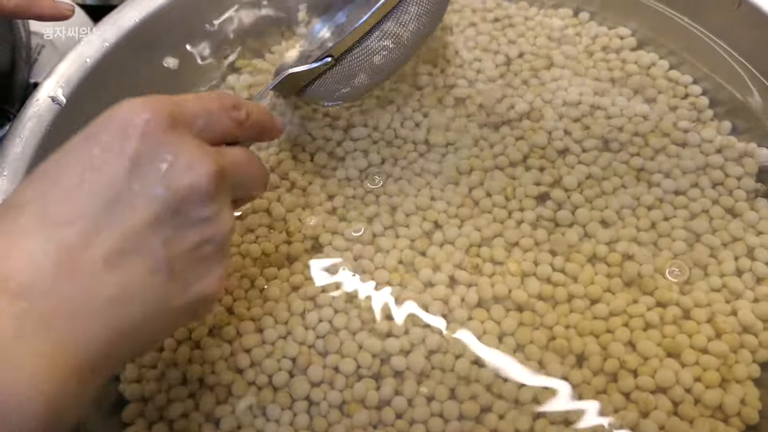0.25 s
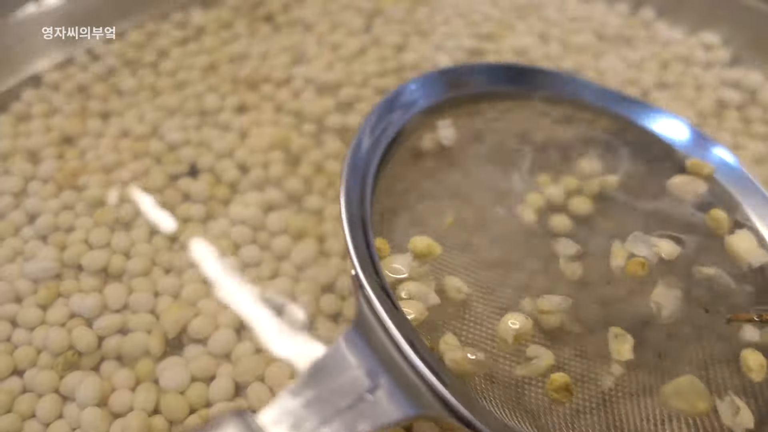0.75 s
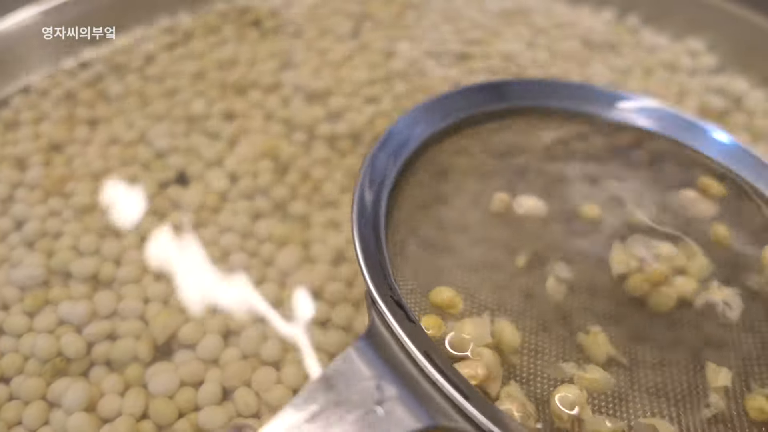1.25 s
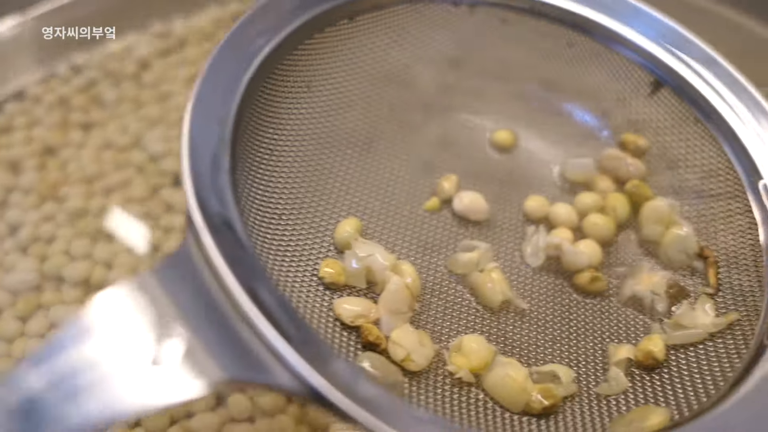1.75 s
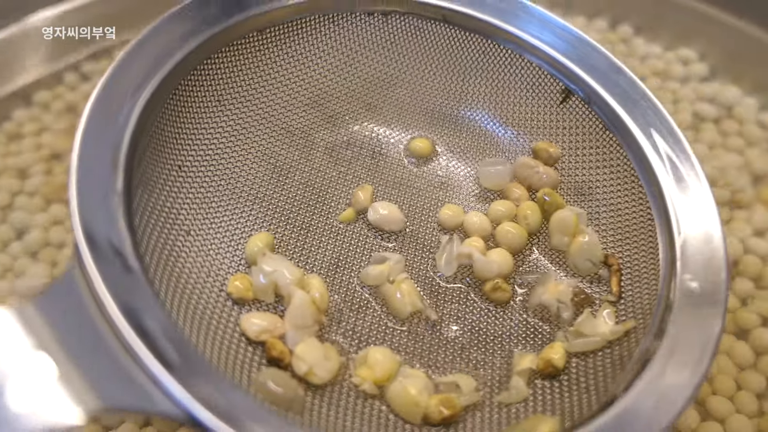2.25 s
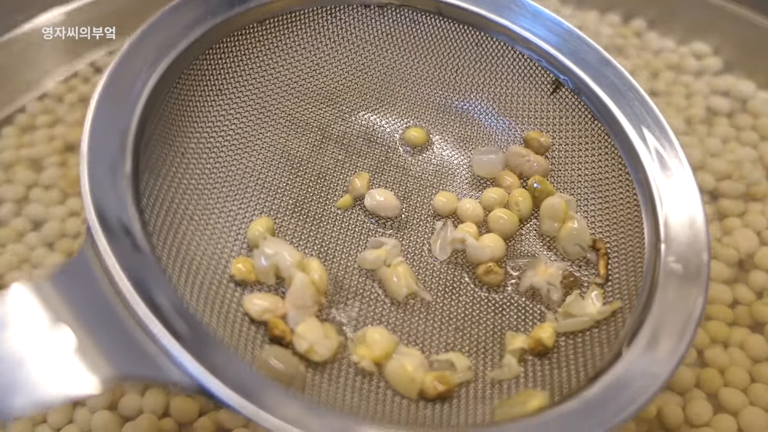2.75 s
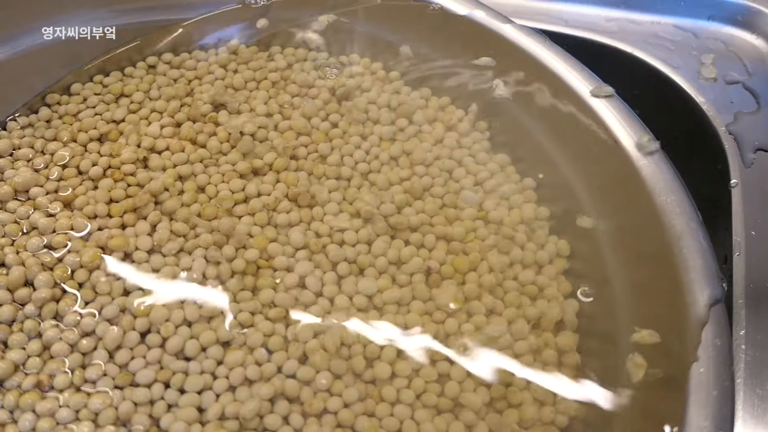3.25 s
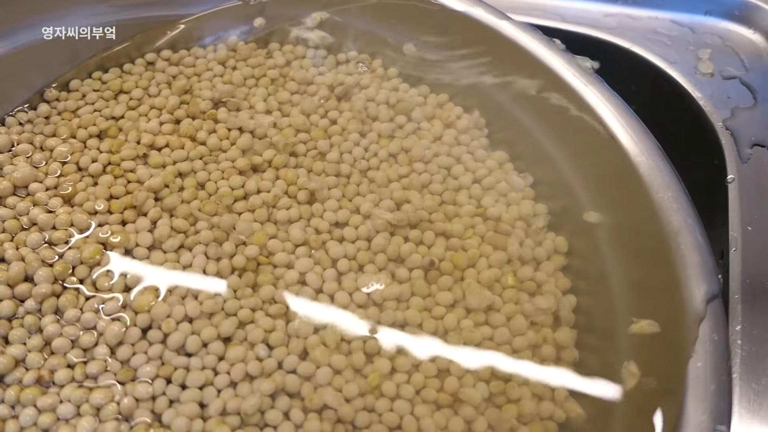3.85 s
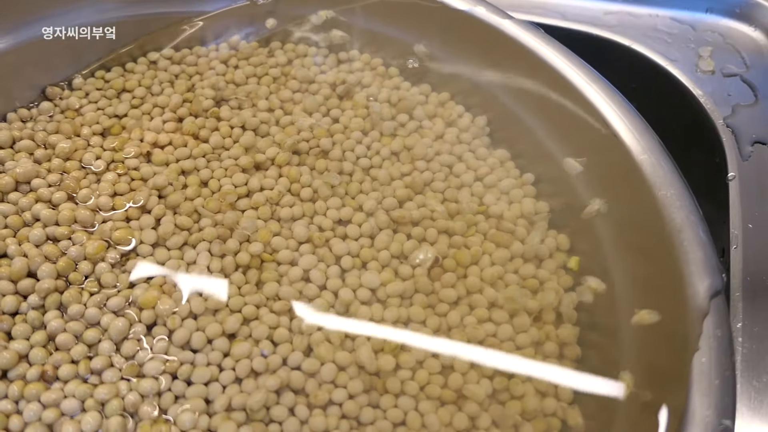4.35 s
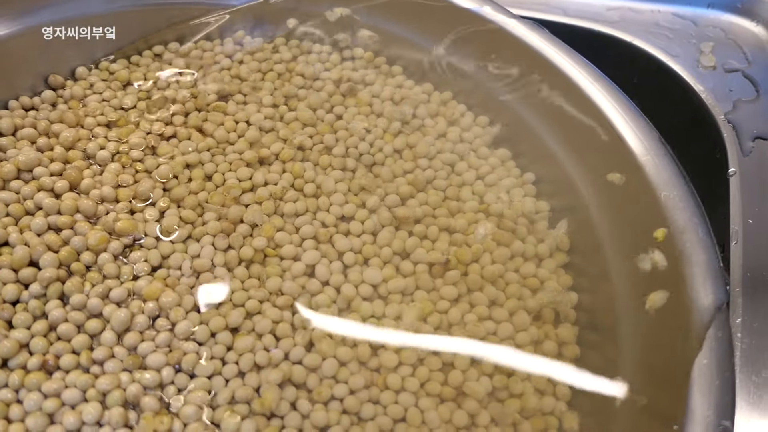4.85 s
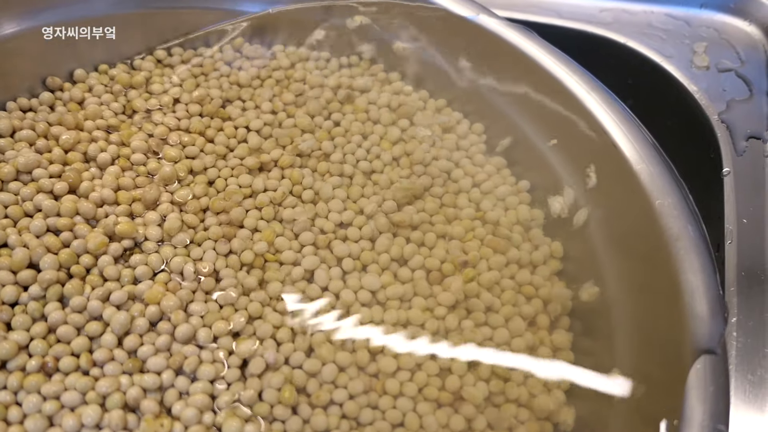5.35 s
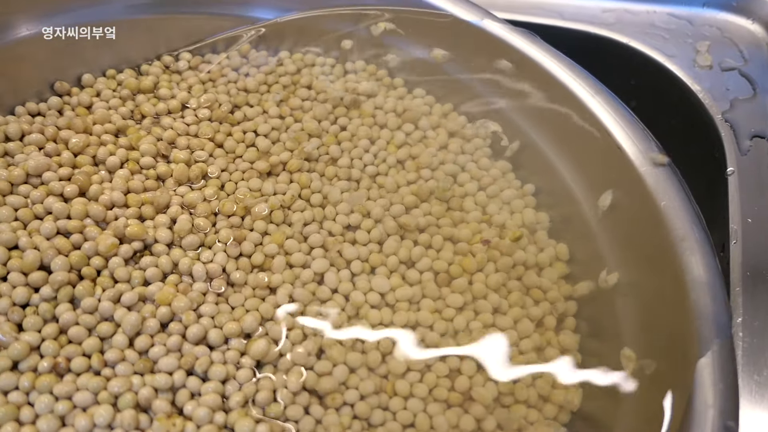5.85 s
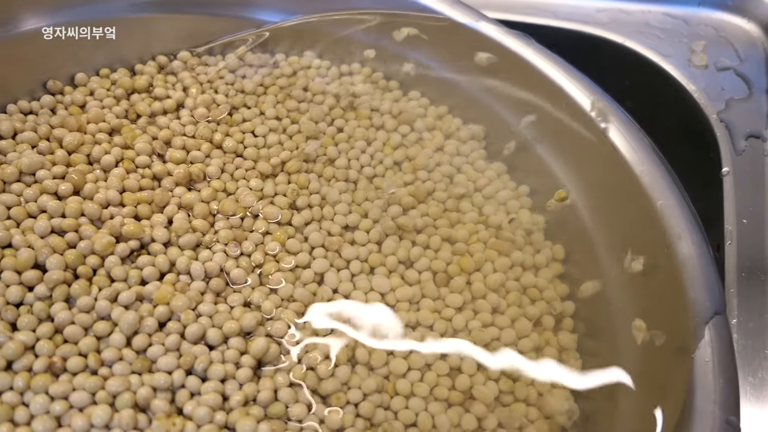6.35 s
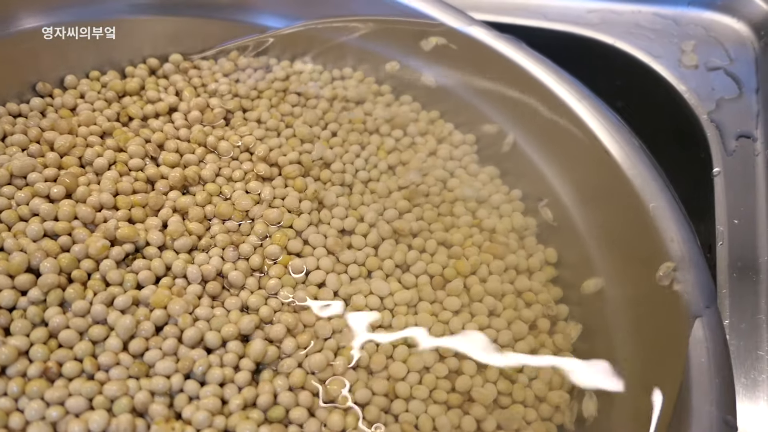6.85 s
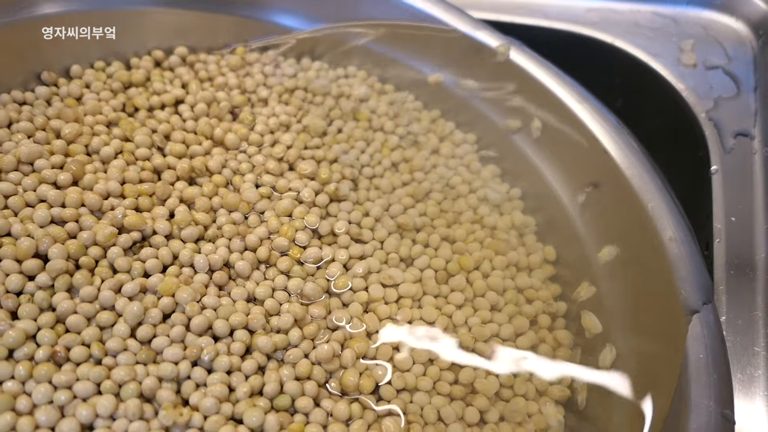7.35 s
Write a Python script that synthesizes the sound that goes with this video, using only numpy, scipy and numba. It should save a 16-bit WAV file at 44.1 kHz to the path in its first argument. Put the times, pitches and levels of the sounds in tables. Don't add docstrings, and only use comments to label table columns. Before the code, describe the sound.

In a quiet kitchen with a faint low appliance rumble, water swishes around a sieve close to the microphone. At about 0.27 seconds its rim knocks a steel bowl with a bright crack, a short metallic ring and a watery thud. The scene cuts at about 0.45 seconds to swishing, crackling water and quick clear drips falling from the mesh, thinning out by 1.9 seconds, with small wire taps. Dull bangs from another room echo at about 1.7 and, louder, 2.0 seconds. A soft handle click comes at 2.9 and a brighter one at 3.3, then brief silence. From 3.5 seconds until the end near 7.6, a tap runs abruptly and steadily into the full bowl: dense bubbling, glugs and plinks, hissing spray, sharp splashes and a drumming steel sink. Gurgling grows, and after about 6.2 seconds a faint low drain rumble joins, with soft deep gulps.

```python
import sys
import numpy as np
from scipy import signal
from scipy.fft import rfft, irfft
from scipy.io import wavfile
from scipy.ndimage import uniform_filter1d
from numba import njit

SR = 44100
rng = np.random.default_rng(int(sys.argv[2]) if len(sys.argv) > 2 else 0)


def ratio_of_db(decibels):
    return 10 ** (np.asarray(decibels, float) / 20)


def dump_mix(stems):
    frames = np.atleast_2d(stems).T
    limited = np.clip(frames, -1, 1)
    pcm = np.round(limited * 32767).astype(np.int16)
    wavfile.write(sys.argv[1], SR, pcm)


N = 335406
T = np.arange(N) / SR
HZ = np.maximum(np.arange(N // 2 + 1) * SR / N, 1.)
SIEVE_CHANGE_S, SIEVE_END_S, TAP_START_S = .452, 3.318, 3.509

# f/Hz, level/dB, t60/s
BOWL_MODES = [(241.0, 1.0, 0.1), (291.6, -3.0, 0.236), (370, -9.5, 0.31), (431, -7.5, 0.41),
              (663.5, -12.5, 0.31), (753, -21.0, 0.68), (900, -21.0, 0.26), (1116, -13, 0.19),
              (1520, -14, 0.11), (1796, -7, 0.1), (3230, -20.5, 0.11), (4650, -14.0, 0.06),
              (6250, -11.5, 0.043)]
# crest t/s, level/dB, swell/s, ebb/s, fine spray/dB
SWISHES = [(0.0, -47, .05, 0.11, -12), (.3, -46, .02, 0.23, -3), (.448, -42.5, 0.15, .1, -1.5),
           (.53, -54, 0.029, 0.11, -6), (.69, -67.5, 0.088, 0.16, -2.5), (.8, -48, 0.26, 0.18, -9),
           (.93, -54.5, 0.09, 0.12, -10), (1.22, -55, 0.21, 0.21, -23.5), (1.41, -48.5, 0.077, 0.17, -2),
           (1.54, -45.5, 0.23, 0.043, -39), (1.61, -45.5, 0.033, 0.089, -27),
           (2.38, -63.5, 0.44, 0.46, 0.5)]
# f/Hz, width/Hz, level/dB
MESH_TONES = [(2050, 330, 10.5), (3000, 1200, 18), (3840, 1400, -4)]
# t/s, peak level/dB, pitch f/Hz, snap/dB
DROPS = [(.111, -31, 8500, -21), (.149, -25, 2270, -16), (0.408, -26.5, 5930, 0), (0.417, -30, 3650, -6),
         (0.4472, -26, 4410, -9), (0.4955, -25, 3080, -16), (.5137, -30.5, 2744, -3),
         (.5484, -31, 5140, -9), (.6998, -38, 4000, 3), (.856, -49, 2060, 17.5), (0.891, -41.5, 2060, 13.5),
         (0.9571, -32.5, 1970, -9), (1.022, -38, 5470, -14), (1.1852, -41, 3120, -4),
         (1.244, -28.5, 3220, -17), (1.3065, -30.5, 7540, -2), (1.362, -31, 3880, -13),
         (1.4037, -33, 3180, -13), (1.4995, -32.5, 2330, -4), (1.587, -36, 2490, -8),
         (1.6033, -31, 3300, -1), (1.6075, -32, 4900, -3), (1.6294, -26.5, 5170, 0), (1.646, -30, 3000, -4),
         (1.676, -38, 7500, -6)]
# t/s, peak level/dB, pitch f/Hz
DRIPS = [(0.535, -39, 3090), (0.622, -48, 3070), (0.6418, -42, 3200), (0.657, -36, 3230),
         (0.7324, -37, 3310), (0.7561, -35, 1990), (0.7754, -37, 2580), (0.794, -36, 2580),
         (0.8074, -32, 3320), (0.8214, -33, 3800), (0.8459, -32, 3560), (0.9074, -39, 3080),
         (1.0609, -46, 3070), (1.1214, -45, 1870), (1.1594, -42, 3100), (1.3352, -39, 5630),
         (1.3482, -38, 3870), (1.392, -34, 3230), (1.4244, -35, 3200), (1.462, -30, 2680),
         (1.5198, -40, 2810), (1.5423, -42, 3190)]
# t/s, peak level/dB
BEADS = [
    (1.7772, -50),
    (1.7991, -45),
    (1.8144, -50),
    (1.834, -39),
    (1.862, -44),
]
# t/s, first tone f/Hz, its level/dB, second tone f/Hz, its level/dB, t60/s
WIRE_TAPS = [
    (1.631, 3340, -21.5, 1430, -26, 0.013),
    (1.915, 3000, -46, 5500, -46, .006),
    (1.961, 2320, -33, 4900, -31, 0.0029),
]
# t/s, low modes level/dB, high modes level/dB
HANDLE_CLICKS = [
    (2.9331, -32.5, -36),
    (3.2808, -25.5, -17.5),
]
# f/Hz, level/dB, t60/s
HANDLE_MODES = [(1200, -7, 0.0074), (1720, -5.5, 0.0094), (2330, 0.5, .012), (3080, -1.5, .012),
                (3800, -13, .012), (5300, -2.5, 0.0054), (6440, 2.5, 0.0053)]
# f/Hz, level/dB per Hz
TAP_COLOUR = [(290, -49), (500, 2), (950, -7.5), (1340, -3), (1790, -4), (2100, -4.5), (9920, -18.5),
              (16000, -32.5)]
# f/Hz, likeness
TAP_LIKENESS = [(60, 0.049), (130, 0.45), (290, 0.8), (640, 0.37), (1410, 0.68), (3100, 0.82), (6820, 0.9),
                (15000, 0.53)]
# f/Hz, left minus right level/dB
TAP_BALANCE = [(60, -1.5), (200, 3.5), (700, 3.5), (2380, -2), (15000, 0)]
# f/Hz, width/Hz, level/dB
SINK_TONES = [(274, 55.5, -2.5), (313.6, 59, -4), (347.2, 12.8, 3), (489, 74, -8.5)]
# f/Hz, width/Hz, level/dB
WATER_TONES = [(863, 36, 6), (1350, 200, -6.5), (2070, 125, 8), (2490, 37, 6), (2920, 24, 2)]
# t/s, length/s, strength level/dB, depth 0-1 (shallow throws spray, deep drums)
SURGES = [(3.647, 0.041, 7, 0.15), (4.16, 0.12, 4, 0.7), (4.313, 0.053, -3, 0.35), (5.268, 0.045, -2, 0.3),
          (4.534, 0.027, 7, 0), (4.65, 0.045, 5.5, 0.27), (4.993, 0.25, 3, 0.3), (5.113, 0.094, 5, 0.42),
          (5.405, 0.082, 5.5, 0.37), (5.617, 0.097, 4.5, 0.81), (5.763, 0.17, 5.5, 0.78),
          (6.15, 0.17, 2.5, 0.46), (6.343, 0.062, 4.5, 0.06), (6.488, 0.12, 4.5, 0.52),
          (6.896, 0.099, 5, 0.06), (6.97, 0.072, 4.5, 0.83), (7.074, 0.079, -2, 0.84),
          (7.233, 0.088, 3.5, 0.8), (7.393, 0.033, 6.5, 0.76)]
# t/s, peak level/dB, pitch f/Hz
GULPS = [(4.045, -22.5, 860), (4.09, -26, 770), (4.395, -28, 714), (5.25, -28, 798), (5.332, -25.5, 860),
         (5.683, -29, 950), (5.731, -20.5, 844), (5.752, -21, 853), (5.807, -19.5, 900), (5.965, -18, 850),
         (6.074, -16.5, 840), (6.098, -16.5, 830), (6.593, -35, 910), (6.644, -25, 884), (6.942, -29, 880),
         (5.575, -30, 458), (5.617, -31, 482), (6.835, -31, 663), (6.945, -24, 732), (7.208, -29.5, 670),
         (7.368, -23, 900)]
# t/s, peak level/dB, pitch f/Hz
GLUGS = [(3.8356, -23.5, 1570), (3.886, -23, 1266), (4.0496, -20, 1230), (4.0703, -24, 1270),
         (4.391, -21, 1180), (4.5083, -21, 1640), (4.5874, -18, 1770), (4.6842, -12.5, 1330),
         (4.7879, -21, 1500), (5.0095, -14.5, 1460), (5.074, -22, 1350), (5.1566, -23, 1350),
         (5.209, -11.5, 1350), (5.3886, -20, 1500), (5.534, -16, 1240), (5.63, -7.5, 1370),
         (5.7303, -22, 1380), (5.806, -22, 1160), (5.4058, -19, 1180), (6.839, -19, 1145),
         (7.0465, -23, 1140), (5.861, -6.5, 1322), (5.9733, -22, 1230), (6.018, -22.5, 1350),
         (6.0435, -23, 1310), (6.076, -24, 1080), (6.1775, -22, 1670), (6.2037, -23, 1460),
         (6.2242, -28, 1350), (6.283, -23, 1240), (6.34, -20, 1350), (6.3748, -16.5, 1540),
         (6.4244, -19.5, 1350), (6.4774, -21, 1350), (6.531, -17, 1565), (6.58, -13.5, 1380),
         (6.6562, -25, 1300), (6.696, -21, 1500), (6.797, -24, 1280), (6.8398, -15.5, 1313),
         (7.0024, -23, 1420), (7.0449, -10, 1324), (7.0992, -21.5, 1250), (7.18, -23, 1300),
         (7.2435, -16, 1364), (7.334, -25, 1120), (7.366, -22, 1700), (7.53, -21, 1350), (7.585, -26, 1380)]
# t/s, peak level/dB, pitch f/Hz
PLINKS = [(3.5193, -25.5, 2090), (3.5932, -28, 2860), (3.6071, -21, 2410), (3.7713, -16.5, 2490),
          (3.8206, -18.5, 1960), (3.8695, -28, 2460), (3.8915, -15.5, 2070), (3.9159, -20, 2020),
          (3.9613, -13.5, 3300), (4.1255, -15.5, 2800), (4.1813, -10.5, 3240), (4.4901, -18, 2900),
          (4.565, -12.5, 2280), (4.7206, -19.5, 2090), (4.748, -19, 2780), (4.7919, -14, 3190),
          (4.8548, -24, 1890), (4.8977, -10.5, 2110), (5.0055, -21, 3000), (5.0658, -11, 2380),
          (5.1062, -16, 2930), (5.1337, -10.5, 2810), (5.2798, -21, 2890), (5.3043, -13, 1997),
          (5.3956, -15, 1980), (5.4654, -18, 2090), (5.5318, -19, 2070), (5.5607, -21, 2220),
          (5.5782, -21, 2060), (5.6031, -12, 2170), (5.651, -16, 2530), (5.6734, -15.5, 2900),
          (5.7188, -14, 3350), (5.7493, -13, 3160), (5.7882, -17, 1980), (5.8231, -12.5, 2530),
          (5.847, -11.5, 2070), (6.073, -18.5, 2500), (6.1324, -18, 2130), (6.1938, -14.5, 2120),
          (6.3404, -21, 2030), (6.4257, -21, 1840), (6.4472, -17, 2150), (6.4686, -16, 2370),
          (6.5794, -19, 2220), (6.6642, -15, 2490), (6.728, -27, 2520), (6.8308, -18, 2500),
          (6.945, -11, 2120), (6.9894, -13.5, 2830), (7.0433, -23, 2500), (7.0623, -13.5, 2490),
          (7.1351, -21, 2150), (7.177, -19, 2120), (7.3377, -21, 2550), (7.3661, -10.5, 2040),
          (7.4699, -19.5, 3080), (7.4883, -20.5, 1960), (7.5502, -16, 2870), (7.5866, -25, 2440)]
# t/s, peak level/dB, pitch f/Hz
PIPE_GULPS = [
    (5.72, -35, 195),
    (6.53, -29.5, 151),
    (6.586, -25.5, 179.4),
    (6.745, -30, 143),
    (6.785, -33, 139),
    (6.9, -29, 162),
    (6.94, -29.5, 198),
]
# t/s, peak level/dB, centre f/Hz
SPLASHES = [(3.5523, -14, 4200), (3.7444, -15.5, 5600), (3.925, -14, 5930), (3.975, -24, 5600),
            (4.161, -12.5, 7000), (4.535, -17, 5800), (4.655, -21, 5500), (4.445, -17, 6250),
            (4.485, -14, 5300), (4.6326, -11, 6060), (4.6785, -13, 3520), (4.884, -11.5, 5030),
            (5.1223, -11, 3630), (5.319, -14, 4400), (5.4136, -20, 6530), (5.57, -12.5, 3610),
            (5.717, -11, 3640), (5.846, -16, 3580), (5.898, -26, 8950), (5.9648, -19, 6560),
            (6.0442, -19, 4420), (6.2432, -20, 3760), (6.7116, -19.5, 9700), (6.832, -16, 3930),
            (7.0898, -20, 4540), (7.128, -18, 3480), (7.2663, -16, 7200), (7.365, -15.5, 5900),
            (7.4675, -17.5, 3980)]
# t/s, peak level/dB
SPITS = [(3.5143, -22.5), (3.5198, -20), (3.653, -19), (3.7313, -27), (4.1045, -20), (4.1529, -16),
         (4.523, -25), (4.6103, -19), (4.6807, -17.5), (4.7786, -17.5), (5.4175, -12.5), (5.5437, -25),
         (5.8216, -18), (5.898, -16.5), (6.0451, -24), (6.1628, -26), (6.2177, -26), (6.299, -19),
         (6.39, -18.5), (6.4282, -23), (6.6866, -27), (6.7131, -24), (6.8053, -21.5), (6.8323, -20),
         (7.1381, -28), (7.2548, -25), (7.2706, -13.5), (7.3606, -23), (7.392, -20), (7.5846, -23)]
# t/s, peak level/dB, centre f/Hz
SMACKS = [(4.1822, -17, 3310), (4.4445, -20, 5080), (4.483, -18, 5260), (4.566, -22, 2350),
          (4.7915, -14.5, 3300), (5.8227, -21, 2510), (6.3405, -17, 2500), (6.467, -21, 2370),
          (6.6643, -24, 2530), (6.8309, -19, 2520), (6.9536, -18, 2510), (6.9892, -14, 2890),
          (7.1287, -13.5, 3430), (7.1766, -21, 2230), (7.3657, -12, 2470), (7.4704, -23, 4000),
          (7.552, -16, 2850)]
# t/s, level/dB, length/s, rise/s
BANGS = [
    (1.691, -13.5, 0.02, 0.004),
    (2.029, -10.5, 0.051, 0.028),
]
# f/Hz, level/dB per Hz
BANG_COLOUR = [(250, -15), (560, -1), (780, 0), (1500, 5.5), (2300, 2), (3400, -11.5), (5900, -20),
               (12000, -41.5)]
# f/Hz, t60/s
HALL_T60 = [(500, 0.46), (1000, 0.51), (2000, 0.36), (4000, 0.39)]
# f/Hz, level/dB per Hz
ROOM_COLOUR = [(18, -60), (30, -38.5), (121, -13.5), (499, -14), (1000, -18.5), (1390, -25.5),
               (10500, -41.5), (16000, -51)]
# f/Hz, likeness
ROOM_LIKENESS = [(60, -0.99), (130, -0.2), (290, -0.17), (640, -0.58), (1410, -0.043), (3100, -0.53),
                 (6820, 0.58), (15000, 0.38)]
# f/Hz, width/Hz, level over the air/dB
HUMS = [(156.3, 14.7, 8.5), (328.5, 35, 4.5)]


def unit(x):
    return x / np.sqrt(np.mean(x ** 2))


def noise():
    return rng.standard_normal(N)


def on_hz(table):
    hz, value = np.transpose(table)
    return np.interp(np.log(HZ), np.log(hz), value)


def shape(x, gain):
    return irfft(rfft(x, N) * gain, N)


def peak(hz, width):
    return 1 / (1 + 1j * (HZ / hz - hz / HZ) * hz / width)


def resonances(table):
    return sum(ratio_of_db(db) * peak(hz, width) for hz, width, db in table)


def band(lo_hz, hi_hz):
    return 1 / np.sqrt((1 + (lo_hz / HZ) ** 8) * (1 + (HZ / hi_hz) ** 8))


def walk(rate):
    k = int(SR / rate)
    steps = np.repeat(rng.standard_normal(N // k + 1), k)
    return 1.34 * uniform_filter1d(uniform_filter1d(steps, k), k)[:N]


@njit
def ring(start, hz, t60, size, glide, rise):
    out = np.zeros(N)
    for k in range(len(start)):
        i, n = int(start[k] * SR), int(t60[k] * SR) + 2
        z = size[k] + 0j
        p = np.exp(2j * np.pi * hz[k] / SR - np.log(1000) / n)
        turn = np.exp(2j * np.pi * hz[k] * glide / SR / n)
        for j in range(min(n, N - i)):
            z *= p
            p *= turn
            out[i + j] += z.imag * min(1., j / (rise * n + 1))
    return out


def bubbles(count, lo_hz, hi_hz, t60, scatter_db, glide, rise):
    when, pitch, life, luck = rng.random((count, 4)).T
    hz = lo_hz * (hi_hz / lo_hz) ** pitch
    size = ratio_of_db(scatter_db * np.minimum(-np.log(1 - luck), 4))
    lives = t60 * (.5 + life) / np.sqrt(hz / 2000)
    return unit(ring(when * T[-1], hz, lives, size, glide, rise))


def bursts(rows):
    out = np.zeros(N)
    for s, db, t60 in rows:
        i, t60 = int(s * SR), max(t60, .003)
        u = T[:min(int(2 * t60 * SR), N - i)]
        out[i:i + len(u)] += ratio_of_db(db - 60 * u / t60)
    return out


def before_change(s):
    return T < (SIEVE_CHANGE_S if s < SIEVE_CHANGE_S else T[-1] + 1)


def wide(mid, other, like):
    c = np.clip(on_hz(like), -.95, .98)
    m = shape(mid, np.sqrt((1 + c) / 2))
    s = shape(other, np.sqrt((1 - c) / 2))
    return np.array([m + s, m - s])


def walls(x, t60, wet_db):
    n = int(.3 * SR)
    tail = rng.standard_normal((2, n)) * ratio_of_db(-60 * T[:n] / t60) * (T[:n] > .001)
    tail[1] = 0.59 * tail[0] + 0.84 * tail[1]
    tail = tail / np.sqrt((tail ** 2).sum(1, keepdims=True))
    return x + ratio_of_db(wet_db) * signal.fftconvolve(x[None], tail, axes=1)[:, :N]


def knock():
    knock_s, knock_db, crack_db = .2733, -16, -19
    hz, db, t60 = np.transpose(BOWL_MODES)
    modes = 0
    for lag, share in [(.001, .8), (.012, 0.41), (.03, .35)]:
        modes = modes + share * ring(knock_s + lag + 0 * hz, hz, t60, ratio_of_db(db + knock_db), 0., 0.035)
    crack = unit(shape(noise(), peak(3700, 4000) * band(1200, 6900) + 0.1 * band(7570, 15000)))
    crack = crack * bursts([(knock_s, crack_db + 3.5, .03), (knock_s + 0.0079, -27, .08)])
    thud = unit(shape(noise(), band(200, 430) + .35 * band(620, 1700)))
    swell = np.clip((T - knock_s) / 0.023, 0, 1)
    return modes + crack + thud * swell * bursts([(knock_s, -27, .3)])


def swishes():
    swell_range_db = 20
    level, spray = 0, 0
    for s, db, swell, ebb, spray_db in SWISHES:
        away = np.where(T < s, (s - T) / max(swell, .002), (T - s) / max(ebb, .002))
        swish = ratio_of_db(db - swell_range_db * away) * before_change(s)
        level = level + swish
        spray = spray + swish * ratio_of_db(spray_db)
    crackle = bubbles(count=16000, lo_hz=1200.0, hi_hz=11960.0, t60=0.0044, scatter_db=2.5,
                      glide=0.17, rise=0.026)
    crackle = crackle + 0.5 * noise()
    body = unit(shape(crackle, resonances(MESH_TONES)))
    fine = unit(shape(crackle, band(5100, 8600) + 0.059 * band(8000, 13000)))
    return ratio_of_db(1.5 * walk(60)) * (level * body + spray * fine)


def drops():
    hiss = noise()
    snap = unit(shape(noise(), band(1100, 6300) + 0.11 * band(7000, 13000)))
    out = bursts([(.2533, -44, .19)]) * snap
    for s, db, hz, snap_db in DROPS:
        t60 = 0.041 * (3000 / hz) ** 0.27
        rough = unit(shape(hiss, peak(hz, .3 * hz)))
        drop = bursts([(s, db - 8.0, t60)]) * rough
        drop = drop + bursts([(s, db + snap_db - 4.5, 0.61 * t60)]) * snap
        soft_start = uniform_filter1d(1. * (T > s + .001), size=90)
        out = out + drop * soft_start * before_change(s)
    return out


def drips():
    s, db, hz = np.transpose(DRIPS)
    hiss = noise()
    snap = unit(shape(hiss, band(1800, 7800)))
    bright = unit(shape(hiss, band(6000, 15000)))
    beads = bright * bursts([(t, d - 5, .008) for t, d in BEADS])
    tones = ring(s, hz, 0.023 + 0 * s, ratio_of_db(db - 2.0), .05, .05)
    return tones + snap * bursts(zip(s, db - 12, .018 + 0 * s)) + beads


def wire_taps():
    s, low_hz, low_db, high_hz, high_db, t60 = np.transpose(WIRE_TAPS)
    edge = band(1800, 2800) + band(6200, 5100) + 0.086 * band(7000, 16000)
    click = np.zeros(N)
    click[(s * SR).astype(int) + 4] = ratio_of_db(high_db + 11.0)
    snap = unit(shape(noise(), edge)) * bursts(zip(s, high_db - 15.0, 2.6 * t60))
    low = ring(s, low_hz, t60, ratio_of_db(low_db), 0., 0.039)
    high = ring(s, high_hz, t60, ratio_of_db(high_db), 0., 0.1)
    return low + high + snap + shape(click, edge)


def handle_clicks():
    hz, db, t60 = np.transpose(HANDLE_MODES)
    is_low = hz < 4000
    sign = np.where(is_low, -1., 1.) * (-1.) ** np.arange(len(hz))
    out = 0
    for s, low_db, high_db in HANDLE_CLICKS:
        size = sign * ratio_of_db(db + np.where(is_low, low_db, high_db))
        out = out + ring(s + 0 * hz, hz, t60, size, 0., 0.024)
    return out


def sieve():
    early = T < SIEVE_CHANGE_S
    air = 1 / (1 + (HZ / 12000) ** 4)
    near = swishes() + shape(drops(), air) + drips()
    before = walls(knock() + near * early, 0.094, -5.5) * early
    after = walls(near * ~early, 0.026, -5.5)
    both = before + after + shape(wire_taps(), air) + handle_clicks()
    return both * ratio_of_db(np.array([[-.5], [.5]]))


def tap():
    froth_db, spray_db, drum_db, thud_db, gurgle_db = stream()
    colour = ratio_of_db(on_hz(TAP_COLOUR)) * (1 + 0.56 * resonances(WATER_TONES))
    drum = sum((-1) ** k * ratio_of_db(db) * peak(f, w) for k, (f, w, db) in enumerate(SINK_TONES))
    sides, flow_db = [], 0.52 * walk(25)
    for _ in range(2):
        froth = bubbles(count=24000, lo_hz=491.5, hi_hz=14730.0, t60=0.024, scatter_db=2.0,
                        glide=0.09, rise=0.03)
        froth = unit(shape(froth, HZ / (1 + (HZ / 7000) ** 2)))
        froth = froth + shape(noise(), .8 + (HZ / 14000))
        froth = patchy(shape(froth, colour), 400, 17000, flow_db, 1.85, rate=45)
        body = unit(shape(froth, band(2430, 3980))) * ratio_of_db(froth_db)
        spray = unit(shape(froth, band(5510, 20000))) * ratio_of_db(spray_db)
        gurgle = unit(shape(froth, band(740, 1400) + 0.17 * band(370, 360))) * ratio_of_db(gurgle_db - 1.0)
        steel = unit(shape(noise(), drum * band(230, 385))) * ratio_of_db(drum_db + 2 * walk(30))
        thud = unit(shape(noise(), band(128, 215) + .04 * band(50, 125)))
        thud = thud * ratio_of_db(thud_db - 1 + 1.5 * walk(15))
        sides.append(ratio_of_db(-0.5) * (body + spray + gurgle + steel + thud))
    single_events = pockets() + splashes() + spits() + smacks() + drain_rumble()
    left, right = wide(sides[0], sides[1], TAP_LIKENESS) + walls(single_events, 0.098, -3.0)
    tilt = on_hz(TAP_BALANCE) / 2
    return np.array([shape(left, ratio_of_db(tilt)), shape(right, ratio_of_db(-tilt))])


def stream():
    t = T - TAP_START_S
    froth, spray, drum = -37 + 0.76 * t, -31.5 - 1.91 * t, -41 + 0.48 * t
    thud, gurgle = -49 + 1.85 * t, -41.5 + 1.5 * t
    for s, length, db, depth in SURGES:
        surge = db * np.exp(-((T - s) / max(length, .01)) ** 2)
        depth = np.clip(depth, 0, 1)
        froth = froth + surge * 4 * depth * (1 - depth)
        spray = spray + surge * 0.85 * (1 - depth)
        drum = drum + surge * 1.9 * depth
        gurgle = gurgle + surge * depth
    return froth, spray, drum, thud, gurgle


def patchy(x, lo_hz, hi_hz, shared_db, own_db, rate):
    edges = np.geomspace(lo_hz, hi_hz, num=int(3 * np.log2(hi_hz / lo_hz)) + 1)
    spectrum = rfft(x)
    drift_db = 2.0 * uniform_filter1d(np.array([walk(14) for _ in edges]), size=4, axis=0)
    out = 0
    for a, b, drift in zip(edges, edges[1:], drift_db):
        part = irfft(spectrum * (HZ >= a) * (HZ < b), N)
        out = out + part * ratio_of_db(shared_db + drift + own_db * walk(rate))
    return out


def pockets():
    s, db, hz = np.transpose(GULPS + GLUGS + PLINKS)
    late, off_pitch = rng.standard_normal((len(s), 2)).T
    t60 = 0.012 * np.minimum(1300 / hz, 1.6) ** 3 + 0.013
    first = ring(s, hz, t60, ratio_of_db(db + .6), 0.051, 0.091)
    second = ring(s + 0.0056 + 0.00197 * late, hz * (1 + 0.073 * off_pitch), t60, ratio_of_db(db - 5.5), 0.075, 0.09)
    hiss, slaps = noise(), 0
    for table, slap_hz, slap_db in [(GULPS, 850, -15), (GLUGS, 1350, -19), (PLINKS, 2600, -19)]:
        slap = unit(shape(hiss, peak(slap_hz, 1.4 * slap_hz) ** 2))
        slaps = slaps + slap * bursts([(r[0], r[1] + slap_db, .1) for r in table])
    bowl = resonances([(f, 0.69 * w, level) for f, w, level in WATER_TONES])
    water = shape(first + second + slaps, band(300, 16000) + 0.24 * bowl)
    return water + shape(pipe_gulps(), band(95, 16000))


def pipe_gulps():
    s, db, hz = np.transpose(PIPE_GULPS)
    return ring(s, hz, 0.19 + 0 * s, ratio_of_db(db + 4.0), 0.15, 0.096)


def splashes():
    hiss, out = noise(), 0
    for s, db, hz in SPLASHES:
        slap = unit(shape(hiss, peak(hz, 0.24 * hz) * band(1700, 12300)))
        out = out + slap * uniform_filter1d(bursts([(s, db - 11.5, .1)]), int(.003 * SR))
    return out


def spits():
    bright = unit(shape(noise(), band(6300, 9500) + 0.26 * band(9900, 15000)))
    return bright * bursts([(s, db - 7.5, .04) for s, db in SPITS])


def smacks():
    s, db, hz = np.transpose(SMACKS)
    body = ring(s, hz, 0.0032 + 0 * s, ratio_of_db(db + 3.0), 0.092, 0.)
    return body - ring(s, 1.6 * hz, .003 + 0 * s, ratio_of_db(db - 7), .1, 0.)


def drain_rumble():
    rumble = unit(shape(noise(), band(48, 110))) * ratio_of_db(2.9 * walk(6.7))
    return rumble * ratio_of_db(np.interp(T, [6.16, 6.16 + .1], [-79.5, -66]))


def bangs():
    push = 0
    for s, db, length, rise in BANGS:
        u = T - s
        push = push + ratio_of_db(db) * np.clip(u / rise, 0, 1) ** 3 * np.clip(1 - u / length, 0, 1)
    colour = ratio_of_db(on_hz(BANG_COLOUR)) * (1 + 0.86 * peak(812, 50))
    field = np.array([[1, 0], [.8, .6]]) @ rng.standard_normal((2, N))
    hall_hz, hall_t60 = np.transpose(HALL_T60)
    out = 0
    for hz in np.geomspace(300, 9600, num=11):
        t60 = np.interp(np.log(hz), np.log(hall_hz), hall_t60)
        energy = signal.lfilter([1], [1, -ratio_of_db(-120 / t60 / SR)], push ** 2)
        part = np.cos(np.pi / 2 * np.clip(2 * np.log2(HZ / hz), -1, 1)) ** 2
        out = out + shape(field, colour * part) * np.sqrt(energy) / 22
    s, hz = np.repeat([1.705, 2.062], repeats=2), np.tile([775., 815.], reps=2)
    return out + ring(s, hz, 0.34 + 0 * s, ratio_of_db(-29.5 + 0 * s), 0., 0.0493)


def slosh():
    water = unit(shape(noise(), band(250, 1500)))
    return water * ratio_of_db(4.6 * walk(40)) * bursts([(0.006, -50.5, 0.58)])


def kitchen():
    colour = ratio_of_db(on_hz(ROOM_COLOUR)) * (1 + resonances(HUMS))
    bass = band(1, 600)
    sides = []
    for x in rng.standard_normal((2, N)):
        rumble = shape(x, colour * bass) * ratio_of_db(2.1 * walk(5.28))
        sides.append(rumble + shape(x, colour * (1 - bass)))
    return ratio_of_db(-49.5 + 4.0) * unit(wide(sides[0], sides[1], ROOM_LIKENESS))


def scene():
    first = sieve() + bangs() + slosh() + kitchen()
    return first * (T < SIEVE_END_S) + tap() * (T >= TAP_START_S)


def band_limit(x):
    return signal.sosfilt(signal.butter(12, 16630, fs=SR, output="sos"), x)


def record(dry):
    low_pass = signal.ellip(12, .2, 80, 15700, fs=SR, output="sos")
    mix = signal.sosfilt(low_pass, dry)
    return band_limit(mix)


dry = scene()
out = record(dry)
dump_mix(out)
```